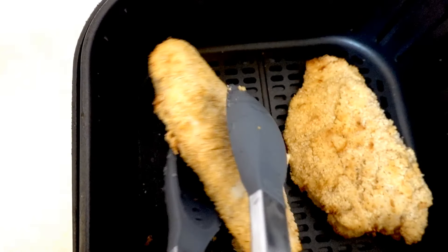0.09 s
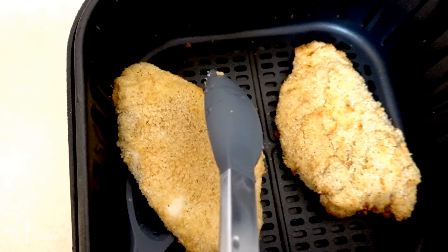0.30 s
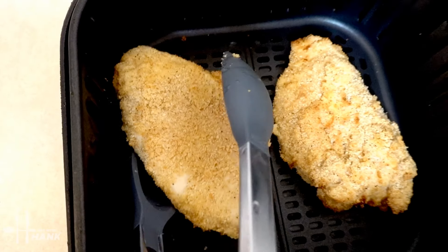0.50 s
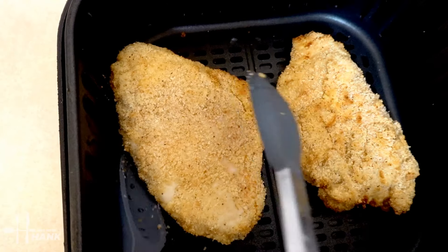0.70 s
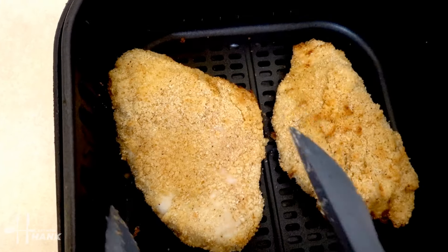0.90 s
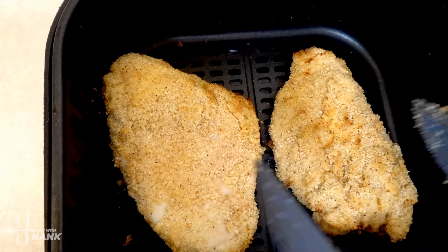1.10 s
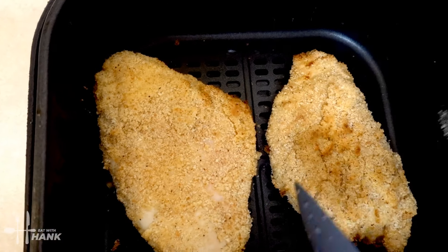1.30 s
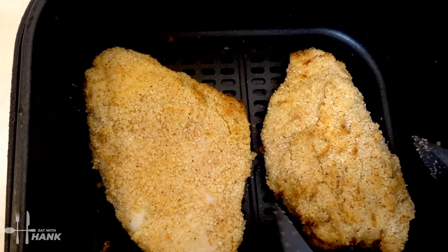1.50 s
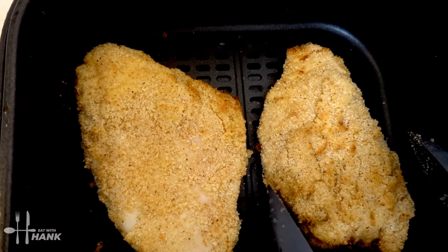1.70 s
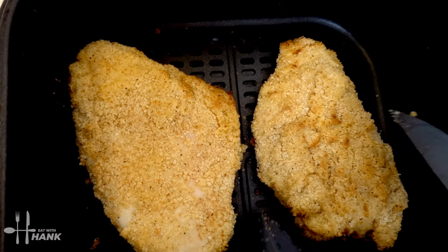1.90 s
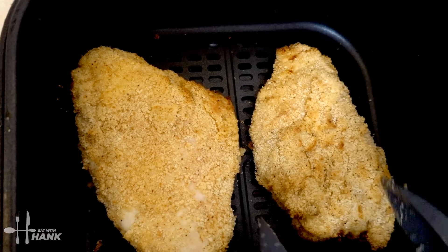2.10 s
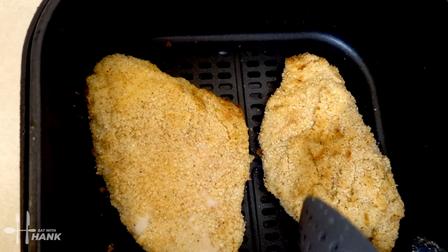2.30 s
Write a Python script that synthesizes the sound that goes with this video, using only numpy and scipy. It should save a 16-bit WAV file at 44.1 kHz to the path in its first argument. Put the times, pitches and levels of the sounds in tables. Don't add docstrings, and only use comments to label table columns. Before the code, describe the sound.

Breaded chicken turned in a fryer basket, heard close in a quiet kitchen with low refrigerator hum. A dry crumbly rasp starts near 0.2 s, with a sharp rattling clack and hollow thud at 0.3, scraping on to 0.6 with tiny crumb ticks. Tongs click at 0.88. After a lull, soft thuds at 1.25, duller knocks around 1.5, then fine grit and small crust snaps until 2.3.

```python
import sys
import numpy as np
from scipy import signal
from scipy.fft import rfft, irfft
from scipy.io import wavfile
from scipy.ndimage import uniform_filter1d

SR = 44100
rng = np.random.default_rng(int(sys.argv[2]) if len(sys.argv) > 2 else 0)


def store_wav(level_fs):
    pcm = np.round(np.clip(np.atleast_2d(level_fs), -1, 1) * 32767)
    wavfile.write(sys.argv[1], SR, pcm.T.astype(np.int16))


def magnitude_from_level(level_db):
    exponent = np.asarray(level_db, float) / 20
    return 10 ** exponent


N = 101430
TIME = np.arange(N) / SR
HZ = np.fft.rfftfreq(N, 1 / SR)

# f/Hz, density/dB per Hz
AIR_SPECTRUM = [(15, -39), (25, -16), (64, -1.5), (149, -14), (463, -14.5), (1070, -27), (2220, -26.5),
                (3520, -36.5), (16000, -48.5)]
# f/Hz, likeness/1
AIR_LIKENESS = [(150, 0.97), (400, 0.88), (1000, 0.17), (3000, 0.11), (15000, 0.101)]
# f/Hz, level/dB
AIR_SHADE = [(200, -0.5), (1000, -4), (4000, 3.5), (15000, -16)]
# t/s, level/dB
DRAG_PRESSURE = [
    (0, -63.5),
    (.15, -66.5),
    (0.208, -62),
    (0.234, -49.5),
    (.4, -46.5),
    (0.541, -45),
    (0.593, -52),
    (0.699, -57),
    (0.861, -75),
]
# t/s, level/dB, t60/s, ring/dB
GRID_KNOCKS = [(0.168, -46, 0.13, 0.5), (.219, -41.5, 0.042, -20), (0.229, -39, 0.28, -1.5),
               (0.2966, -25, 0.022, 7.5), (0.299, -40.5, 0.072, 13), (0.411, -42, 0.25, -28),
               (.476, -43, 0.034, 11), (.51, -39, 0.035, 1), (0.607, -43, 0.099, -3.5),
               (0.623, -35, 0.074, -8.5), (0.644, -60, 0.046, 24.5), (0.714, -59, .05, -2),
               (0.532, -36, 0.025, -3)]
# f/Hz, width/Hz, level/dB
GRID_MODES = [(679, 120, -13), (887, 20, -3), (1060, 37, -8.5), (2470, 58, -12.5), (2375, 16.7, -1),
              (2432, 30, 3.5), (2763, 39, -3.5), (2862, 33, 5), (3226, 68, -2.5), (3400, 90, -13),
              (4060, 95, -13), (5300, 427, -3)]
# f/Hz, density/dB per Hz
GRID_HISS = [(180, -20), (300, -16), (870, -14), (2210, -11.5), (2520, -3), (3640, -11.5), (9240, -12),
             (16000, -23.5)]
# t/s, level/dB, shove/s, brightness/dB per octave, ring share/1
THUDS = [(0.204, -62.5, 0.017, 6, 0.65), (0.227, -59, 0.017, 5, 0.67), (.299, -36.5, 0.0063, 5, 0.69),
         (0.326, -45.5, 0.02, 10, 0.52), (0.599, -46, 0.031, 6, 0.66), (0.641, -46, 0.032, 6, 0.45),
         (.7, -57, 0.059, 5.5, 0.67), (0.829, -60, 0.028, 3.5, 0.61), (0.868, -53.5, 0.013, 2, 0.43),
         (0.894, -59.5, 0.015, 3, 0.61), (1.246, -43.5, 0.018, -6.5, 1), (1.272, -50, 0.023, 0, 1),
         (1.3, -48, 0.043, -7.5, 0.58), (1.334, -56, 0.012, 0.5, 0.85), (1.506, -35.5, 0.026, -0.5, 1),
         (1.53, -36, 0.015, 3.5, 0.49), (1.562, -40, 0.0098, -0.5, 0.74), (1.589, -46, 0.063, 1, 0.48),
         (1.64, -52.5, 0.021, 2.5, 1)]
# f/Hz, level/dB, t60/s
BASKET_MODES = [(73.6, -28.5, 0.039), (100, -31, 0.068), (132.8, 0, 0.45), (165.9, -1, 0.27),
                (214.9, -1, 0.21), (250, -5, 0.21), (329.5, -6.5, 0.24), (379, -13, 0.2), (434.8, -7, 0.21),
                (488, -5, 0.09), (607, -5, 0.067), (754, -18.5, 0.065), (859, -12, 0.055), (992, -13, 0.16)]
# t/s,
# level/dB, pitch/Hz
CRUMBS = [(0.2953, -49, 12500), (.2975, -47, 9500), (.410, -41, 12500), (.252, -50, 12000),
          (.357, -61, 9000), (.439, -42, 10500), (.532, -44, 10000), (.689, -60, 10500), (.702, -58, 9000),
          (.713, -68, 4000), (0.753, -65, 10300), (0.756, -61, 5500), (.760, -65, 5500),
          (0.769, -56.5, 7500), (0.769, -65, 10000), (0.78, -65, 11000), (0.788, -63, 11400),
          (0.794, -61.5, 10000), (.805, -62, 6000), (.818, -71, 10500), (.826, -71, 11000)]
# t/s, level/dB
CLACKS = [
    (.2965, -30),
    (.2985, -29),
    (.3005, -30),
    (.3035, -26),
    (.3070, -39.5),
    (.3140, -31),
    (.336, -39),
]
# f/Hz, level/dB, t60/s
PLATE_MODES = [(863, -4.5, 0.037), (1463, -9, 0.038), (2530, -0.5, 0.038), (2650, -6.5, 0.033),
               (2980, 1, 0.047), (3370, -19, 0.016), (4710, -2, 0.013), (7500, -12.5, .012)]
# t/s, level/dB
HINGE_TICKS = [
    (0.8754, -45),
    (0.902, -69),
    (0.928, -72),
]
# f/Hz, width/Hz, level/dB
HINGE_MODES = [(2350, 110, 13), (2720, 600, 10.5), (3650, 720, 1), (4250, 830, 1.5), (4920, 650, 11),
               (6920, 450, 10.5), (9900, 920, 6)]
# t/s, level/dB
CREEP_PRESSURE = [
    (1.15, -100),
    (1.25, -78.5),
    (1.45, -69),
    (1.7, -66),
    (1.93, -61.5),
    (2.1, -65.5),
    (2.3, -66.5),
]
# t/s, level/dB, treble/dB
CRUST_SNAPS = [(1.028, -70, -12), (1.140, -75, 3), (1.197, -68, -10), (1.22, -67.5, -3), (1.245, -60, -5.5),
               (1.271, -65, 0.5), (1.332, -70, 0), (1.351, -69, -3), (1.376, -62, 0), (1.427, -61.5, 1.5),
               (1.465, -70, -7), (1.488, -58.5, -6), (1.51, -48.5, -10.5), (1.572, -52, -11),
               (1.606, -62, 6), (1.639, -53, -7), (1.696, -51.5, -4), (1.737, -56, 4), (1.756, -56.5, 3),
               (1.7865, -55.5, -4), (1.807, -53, -8), (1.818, -54, 2), (1.862, -67, 17), (1.877, -60, -6),
               (1.904, -65, 11.5), (1.924, -63, 5), (1.961, -50, 0), (1.984, -50, -11), (2.051, -62, -2),
               (2.062, -56, -11), (2.079, -57, -8), (2.151, -62, -14), (2.181, -61, -9), (2.205, -57, -11),
               (2.249, -57, 2)]
# f/Hz, width/Hz, level/dB
WALL_MODES = [(1845, 200, 1), (2393, 100, -1), (3230, 250, -1), (4660, 280, 4.5), (7040, 680, 3),
              (3990, 79, -10), (8300, 520, -1.5), (10310, 410, -6), (14400, 900, -9.5)]
# f/Hz, density/dB per Hz
WALL_HISS = [(290, -47.5), (500, -14.5), (659, -9), (919, -35), (2430, -5.5), (3650, -11.5), (4660, -14.5),
             (16000, -16.5)]
# t/s, level/dB
RIM_HITS = [
    (1.5065, -39),
    (1.567, -50),
]
# f/Hz, level/dB, t60/s
RIM_MODES = [(434.7, 0.5, .28), (480, -9, 0.062), (580, -5, 0.12), (633, -7, 0.032)]
# f/Hz, level/dB
GRID_SHADE = [(150, -4), (500, -3.5), (1000, -4.5), (2500, -2), (4500, -2.5), (8000, -13.5), (15000, -23)]
# f/Hz, level/dB
WALL_SHADE = [(150, -23), (1000, 2.5), (2500, 0.5), (5000, -1.5), (8000, -14.5), (15000, -22)]
# f/Hz, likeness/1
BASKET_LIKENESS = [(200, 1), (600, 0.96), (1200, 0.8), (2500, 0.93), (5000, 0.13), (15000, 0.15)]


def evened(x):
    return x / np.sqrt(np.mean(x ** 2) + 1e-20)


def read(points, hz):
    f, value = np.transpose(points)
    return np.interp(np.log(hz + 1), np.log(f + 1), value)


def shaped(x, gain):
    return irfft(rfft(x) * gain, N)


def below(hz):
    return 1 / (1 + (HZ / hz) ** 6)


def above(hz):
    return 1 / (1 + (hz / (HZ + 1)) ** 6)


def ring(x, hz, width_hz):
    r = np.exp(-np.pi * width_hz / SR)
    w = 2 * np.pi * hz / SR
    return signal.lfilter([1 - r * r, 0, r * r - 1], [2, -4 * r * np.cos(w), 2 * r * r], x)


def body(x, modes):
    return sum(magnitude_from_level(db) * ring(x, f, w) * np.sqrt(SR / w / 40) for f, w, db in modes)


def grit(per_s, spread_db, smooth):
    size = magnitude_from_level(spread_db * np.minimum(rng.exponential(1, N), 3))
    clicks = size * (rng.random(N) < per_s / SR) * rng.standard_normal(N)
    tail = rng.standard_normal(300) * magnitude_from_level(-60 * TIME[:300] / 0.0022)
    clicks = signal.oaconvolve(clicks, tail)[:N]
    return evened(evened(clicks) + smooth * rng.standard_normal(N))


def wobble(top_hz, depth_db):
    drift = shaped(rng.standard_normal(N), (HZ < top_hz) / np.sqrt(HZ + 3))
    return magnitude_from_level(depth_db * evened(drift))


def burst(s, db, rise_s, t60_s):
    t = np.maximum(TIME - s, 0)
    return np.minimum(t / rise_s, 1) * magnitude_from_level(db - 60 * t / t60_s)


def patchy(x, depth_db, scatter_rad):
    z = signal.stft(x, nperseg=256)[2]
    a, b = rng.standard_normal(z.T.shape + (2,)).T
    field = uniform_filter1d(uniform_filter1d(a, size=5, axis=0), size=24, axis=1)
    z = z * magnitude_from_level(depth_db * evened(field)) * np.exp(1j * scatter_rad * b)
    return signal.istft(z, nperseg=256)[1][:N]


def struck(hits, modes, rise_s):
    out, t = np.zeros(N), TIME[:SR // 4]
    phases = rng.uniform(0, 2 * np.pi, (len(hits), len(modes)))
    for (s, db), phase in zip(hits, phases):
        sound = sum(magnitude_from_level(db + d - 60 * t / t60) * np.sin(2 * np.pi * f * t + p)
                    for (f, d, t60), p in zip(modes, phase))
        out[round(s * SR):][:len(t)] += sound * np.minimum(t / rise_s, 1)
    return out


def placed(x, shade):
    lag_s = 0.0001
    taps = rng.standard_normal(3000) * magnitude_from_level(-60 * TIME[:3000] / 0.0097)
    reflected = signal.oaconvolve(x, taps / np.linalg.norm(taps))[:N]
    reflected = magnitude_from_level(2.0) * patchy(reflected, 1.0, 2.94)
    onset = HZ ** 2 / (HZ ** 2 + 300 ** 2)
    like = np.clip(1 - (1 - read(BASKET_LIKENESS, HZ)) * onset, 0, 1)
    tilt = magnitude_from_level(read(shade, HZ) * onset)
    direct = shaped(x, like * tilt * np.exp(-2j * np.pi * HZ * lag_s))
    left = direct + shaped(reflected, np.sqrt(1 - like ** 2) * tilt)
    return np.array([left, x])


def kitchen():
    air_db, hum_hz, hum_db, hum_width_hz = -67.5, 61.3, -68.5, 5.6
    a, b = rng.standard_normal((2, N))
    like = np.clip(read(AIR_LIKENESS, HZ), 0, 1)
    gain = magnitude_from_level(read(AIR_SPECTRUM, HZ))
    tilt = magnitude_from_level(read(AIR_SHADE, HZ) / 2)
    right = shaped(a, gain * like / tilt) + shaped(b, gain * np.sqrt(1 - like ** 2) / tilt)
    air = evened(np.array([shaped(a, gain * tilt), right]))
    waver = evened(ring(rng.standard_normal(N), hum_hz, hum_width_hz))
    hum = evened(np.sqrt(2) * np.sin(2 * np.pi * hum_hz * TIME) + 0.45 * waver)
    return magnitude_from_level(air_db) * air * wobble(36, 0.8) + magnitude_from_level(hum_db) * hum


def drag():
    heavy_hz, heavy_db, heavy_slope = 1800, -59, 0.64
    light_hz, light_db, light_slope = 3440, -42.5, 0.34
    t, db = np.transpose(DRAG_PRESSURE)
    press = magnitude_from_level(np.interp(TIME, t, db, right=-130)) * wobble(80, 1.3)
    noise, crush = grit(3000, 3.6, 1.12), rng.standard_normal(N)
    crushed = crush * sum(burst(s, d - 3.0, 0.00089, t60 * 1.2) for s, d, t60, _ in GRID_KNOCKS)
    knocked = crush * sum(burst(s, d + r, 0.0011, t60) for s, d, t60, r in GRID_KNOCKS)
    hiss = shaped(noise * press + crushed, evened(magnitude_from_level(read(GRID_HISS, HZ))))
    ringing = body(noise * magnitude_from_level(-0.5) * press + knocked, GRID_MODES)
    rasp = patchy(magnitude_from_level(2.0) * hiss + magnitude_from_level(-3.0) * ringing, 1.52, 0)
    low = shaped(rasp, below(heavy_hz))
    high = shaped(rasp, above(light_hz)) * (TIME > 0.4)
    level_db = np.interp(TIME, t, db)
    low_loss = 1 - magnitude_from_level(heavy_slope * np.minimum(level_db - heavy_db, 0))
    high_loss = 1 - magnitude_from_level(light_slope * np.minimum(level_db - light_db, 0))
    return rasp - high * high_loss - low * low_loss


def thuds():
    bump_s, bump_db, bump_width_s = 0.0545, -37.5, 0.00065
    bass_cut_hz, soft_hz = 88, 980
    out, t = np.zeros(N), TIME[:SR // 2]
    for s, db, shove_s, bright_db, share in THUDS:
        random = rng.uniform(-0.68, 0.36, (len(BASKET_MODES), 2))
        modes = np.zeros(len(t))
        for (f, d, t60), (phase, uneven) in zip(BASKET_MODES, random):
            tilt_db = bright_db * np.log2(f / 200)
            decay = magnitude_from_level(d + tilt_db + 2.4 * uneven - 60 * t / (t60 * share))
            modes += decay * np.sin(2 * np.pi * f * t + phase)
        push = rng.standard_normal(2000) * np.exp(-TIME[:2000] / shove_s) * (rng.random(2000) < 0.01)
        push[0] = 1.01
        sound = signal.oaconvolve(modes, push / np.linalg.norm(push))[:len(t)]
        sound *= np.minimum(t / 0.0027, 1)
        at = round(s * SR)
        out[at:at + len(t)] += magnitude_from_level(db) * sound[:N - at]
    out = signal.sosfilt(signal.butter(3, bass_cut_hz, "high", fs=SR, output="sos"), out)
    out = shaped(out, 1 / np.sqrt(1 + (HZ / soft_hz) ** 6))
    u = (TIME - bump_s) / bump_width_s
    return out - magnitude_from_level(bump_db) * (np.exp(-u ** 2 / 2) - 0.13 * np.exp(-((u - 1.5) / 10.0) ** 2 / 2))


def crumbs():
    q, t60_s = 2.7, 0.024
    noise = np.sign(rng.standard_normal(N))
    return sum(2.35 * ring(noise * burst(s, db, 0.00043, t60_s), hz, hz / q) for s, db, hz in CRUMBS)


def clack():
    return struck(CLACKS, PLATE_MODES, 0.00068)


def hinge():
    clicks = sum(burst(s, d, 0.00018, 0.009) for s, d in HINGE_TICKS)
    tick = body(np.sign(rng.standard_normal(N)) * clicks, HINGE_MODES)
    tick = shaped(tick, HZ ** 4 / (HZ ** 4 + 1700 ** 4) / (1 + (HZ / 11000) ** 8))
    return np.array([magnitude_from_level(3.0) * tick, magnitude_from_level(-5.0) * np.roll(tick, 3)])


def creep():
    treble_hz = 5600
    t, db = np.transpose(CREEP_PRESSURE)
    press = magnitude_from_level(np.interp(TIME, t, db, left=-130)) * wobble(41, 1.0)
    rasp, crack = grit(420, 3.4, 1.0) * press, np.sign(rng.standard_normal(N))
    dull = crack * sum(burst(s, d, 0.00062, 0.023) for s, d, _ in CRUST_SNAPS)
    bright = crack * sum(burst(s, d + b, 0.00062, 0.023) for s, d, b in CRUST_SNAPS)
    high = above(treble_hz)
    drive = rasp + shaped(dull, 1 - high) + shaped(bright, high)
    hiss = shaped(drive, evened(magnitude_from_level(read(WALL_HISS, HZ))))
    return patchy(magnitude_from_level(-0.5) * hiss + magnitude_from_level(2.5) * body(drive, WALL_MODES), 1.4, 0)


def rim():
    return struck(RIM_HITS, RIM_MODES, 0.0025)


def scene():
    grid = placed(drag() + thuds(), GRID_SHADE)
    wall = placed(creep(), WALL_SHADE)
    blows = placed(crumbs() + clack() + rim(), GRID_SHADE)
    return kitchen() + grid + blows + hinge() + wall


def low_pass(x):
    return signal.sosfilt(signal.butter(12, 16320, fs=SR, output="sos"), x)


def record(dry):
    edge_hz = 15830
    lowpass = signal.firwin(511, edge_hz, window=("kaiser", 9), fs=SR)
    limited = signal.oaconvolve(dry, lowpass[None], "same")
    return low_pass(limited)


dry = scene()
out = record(dry)
store_wav(out)
```